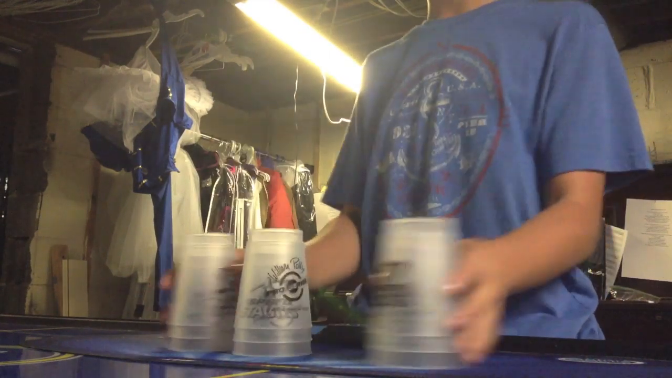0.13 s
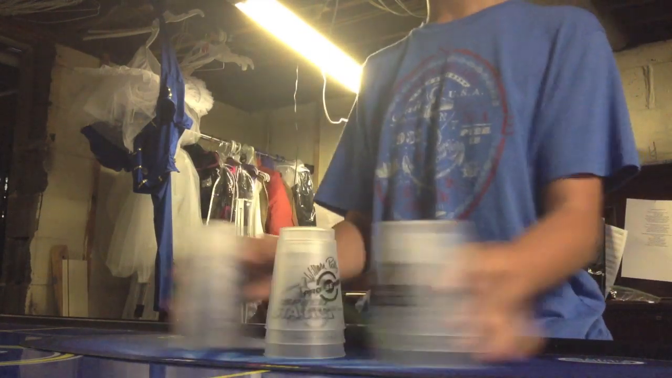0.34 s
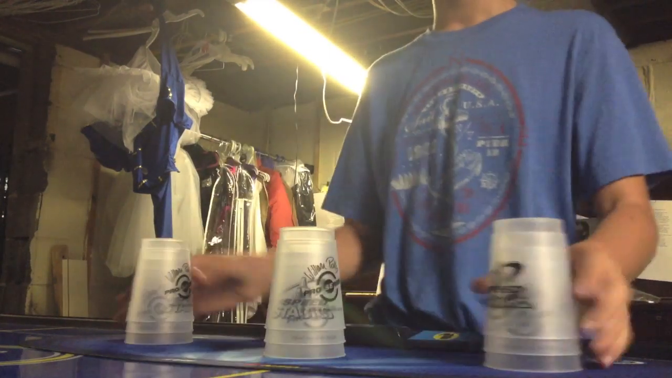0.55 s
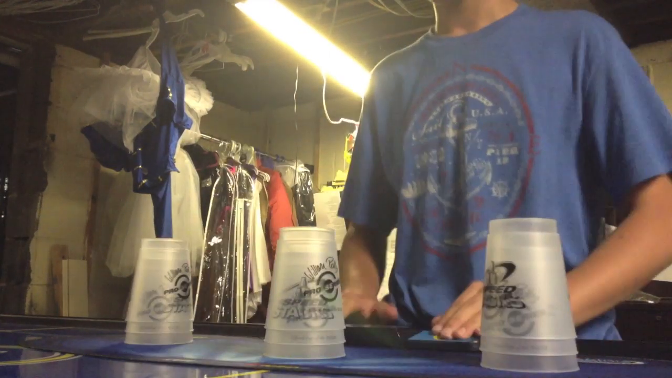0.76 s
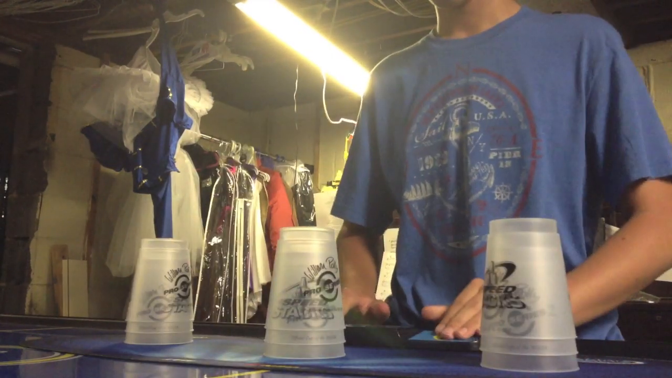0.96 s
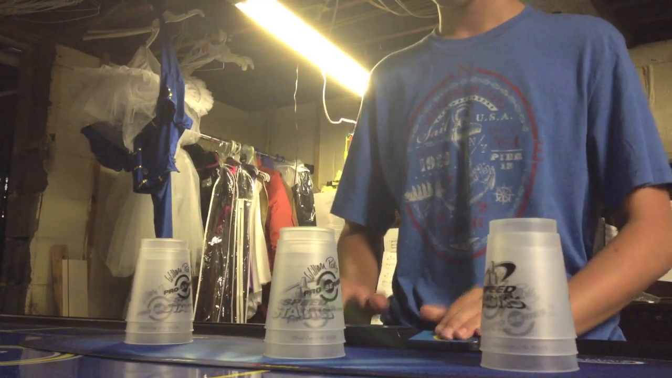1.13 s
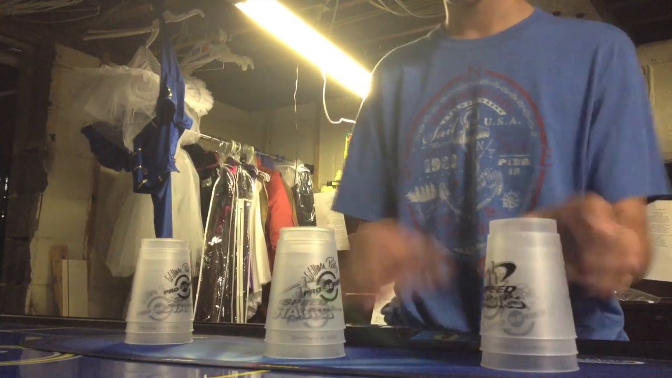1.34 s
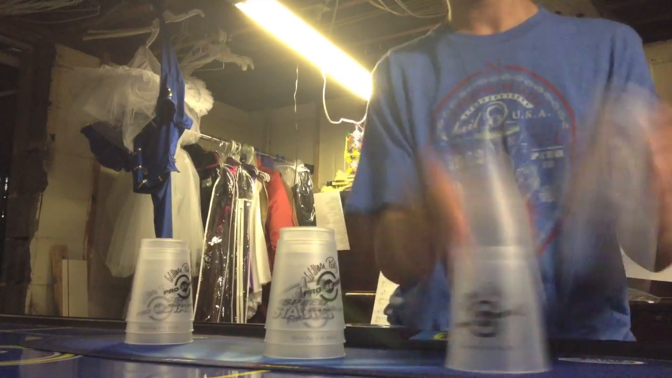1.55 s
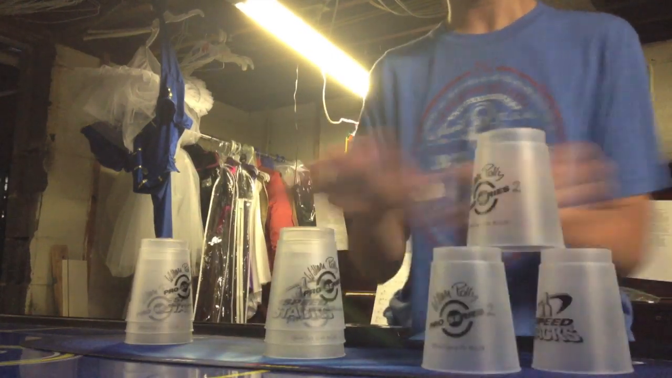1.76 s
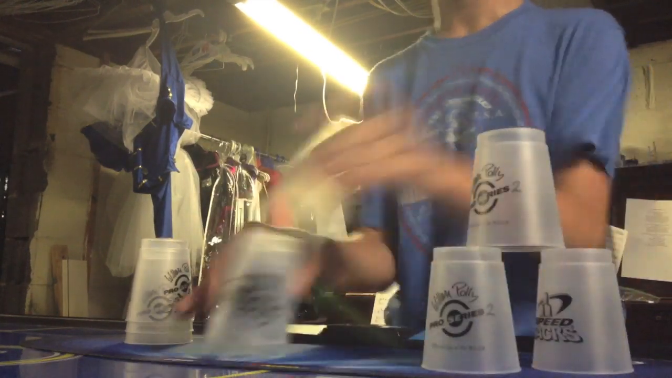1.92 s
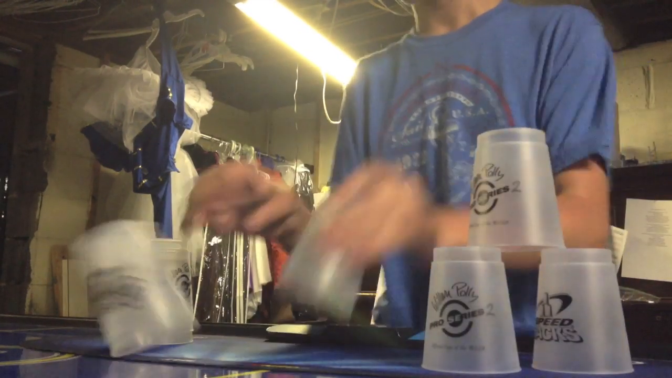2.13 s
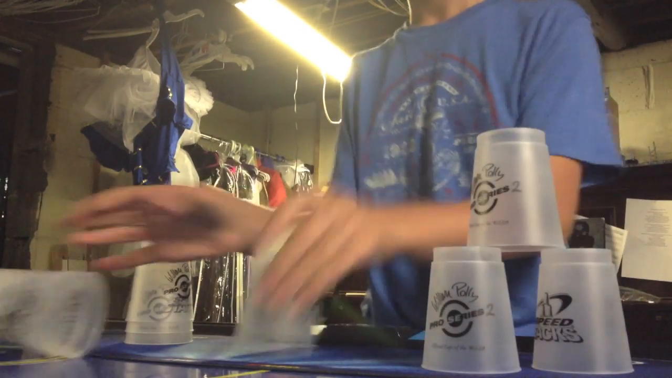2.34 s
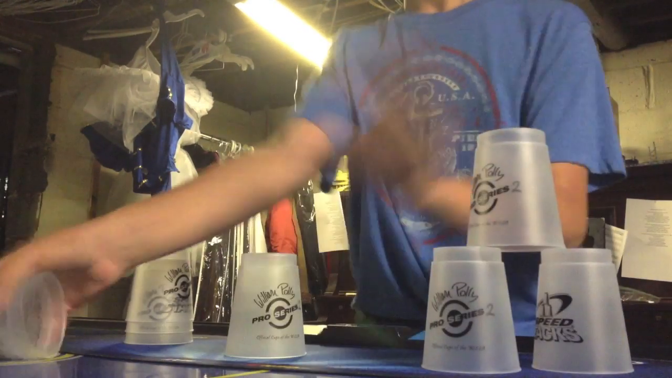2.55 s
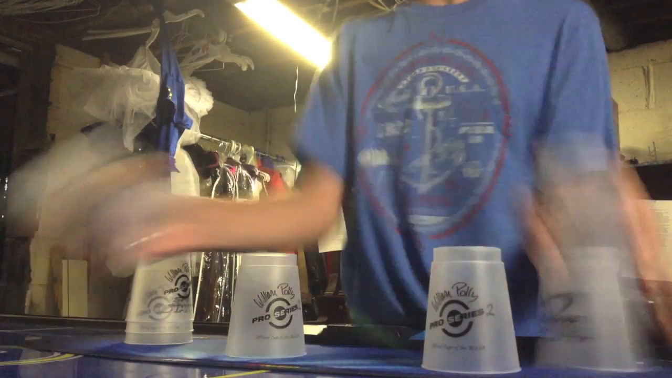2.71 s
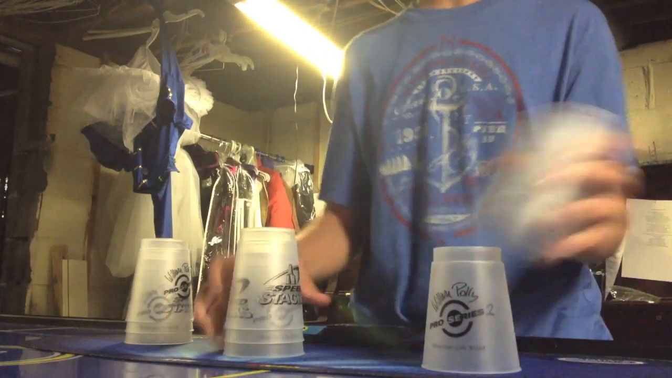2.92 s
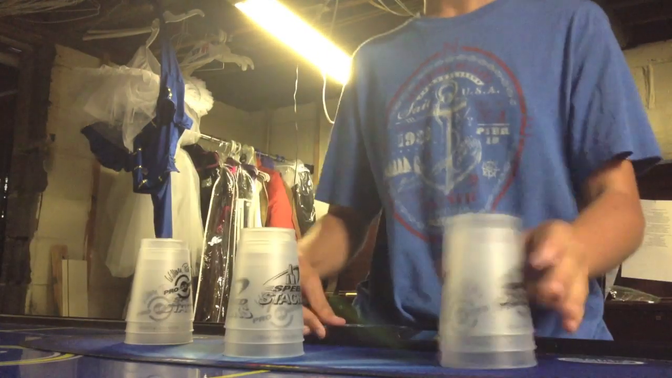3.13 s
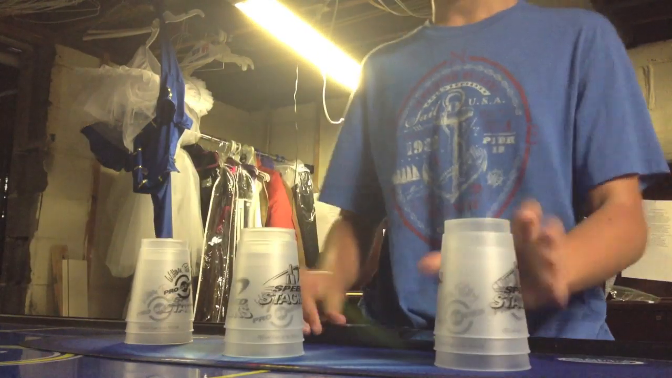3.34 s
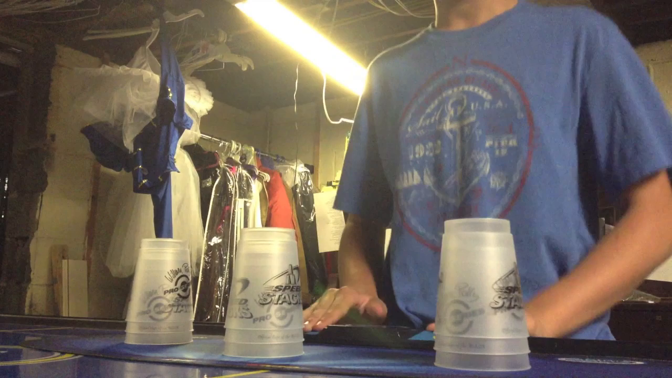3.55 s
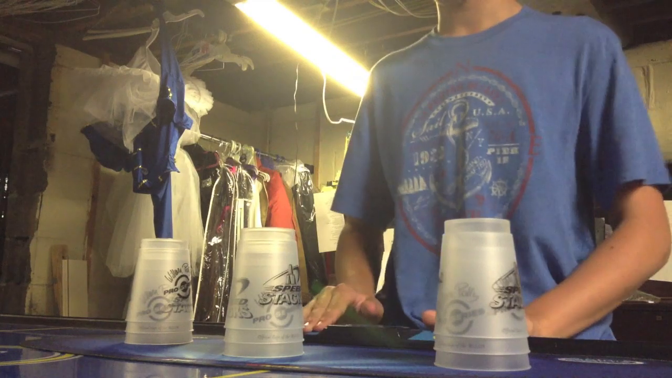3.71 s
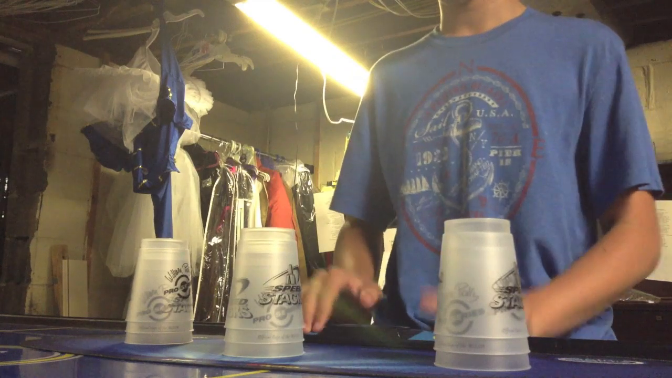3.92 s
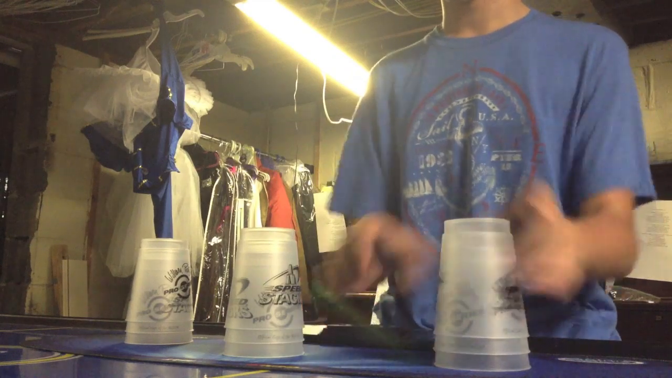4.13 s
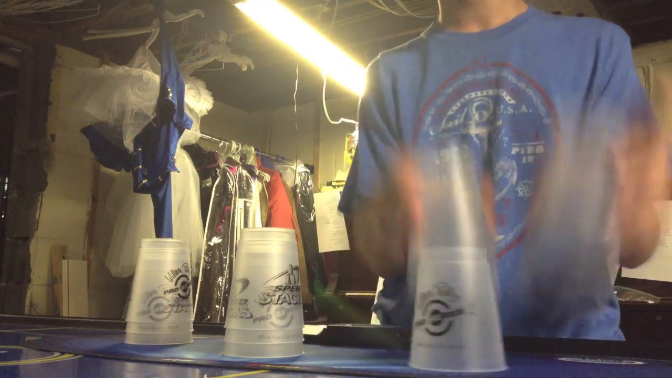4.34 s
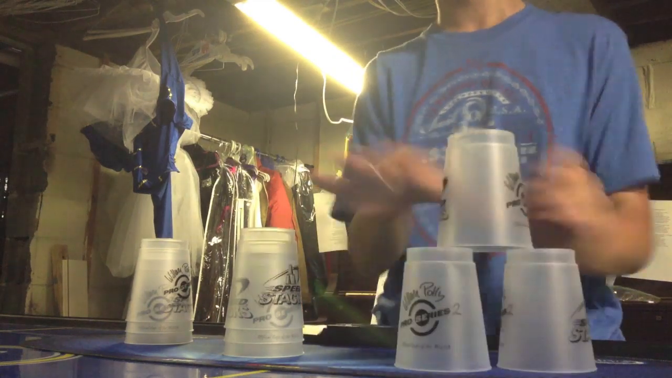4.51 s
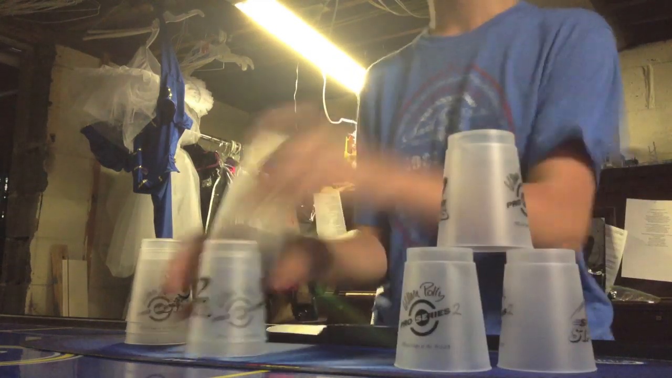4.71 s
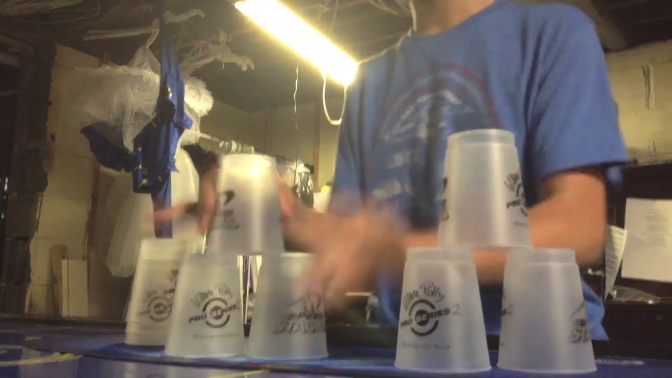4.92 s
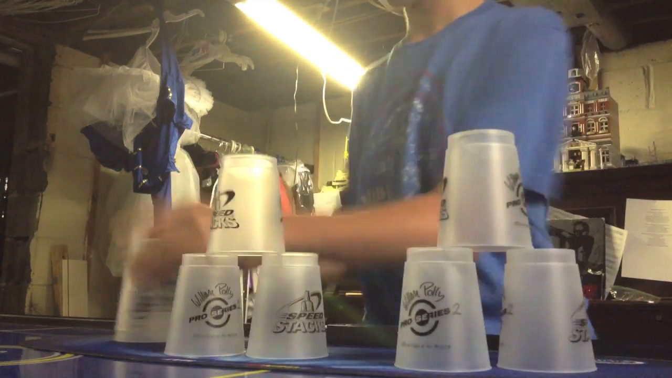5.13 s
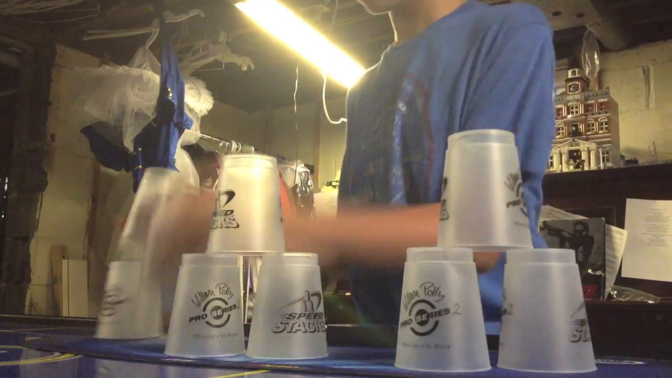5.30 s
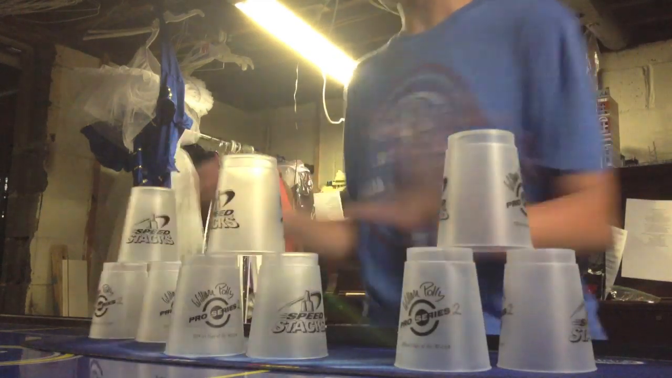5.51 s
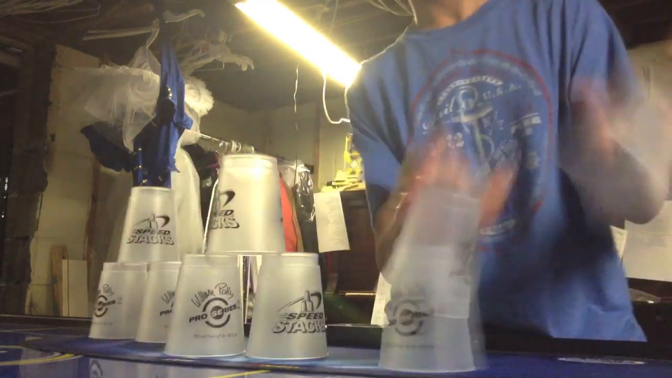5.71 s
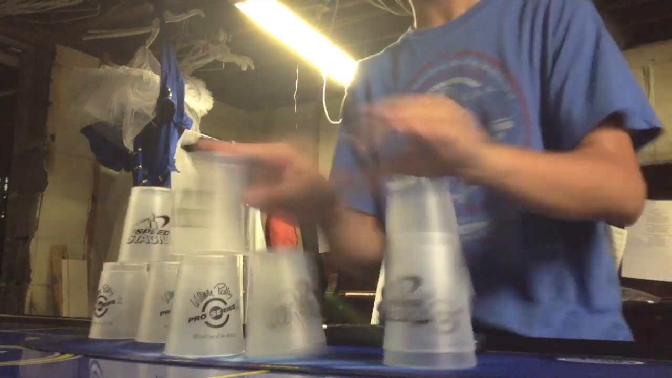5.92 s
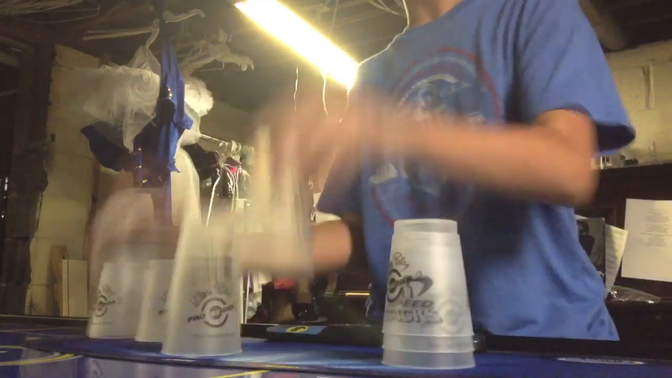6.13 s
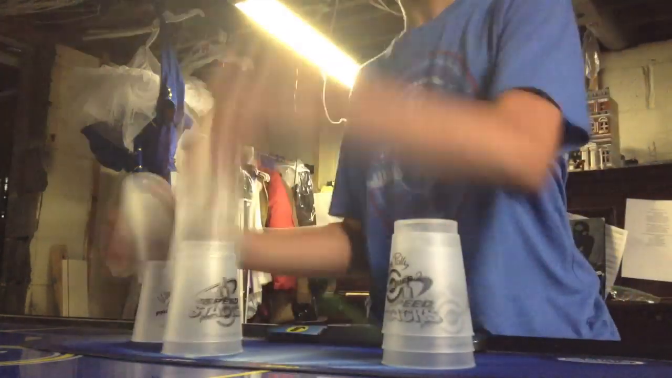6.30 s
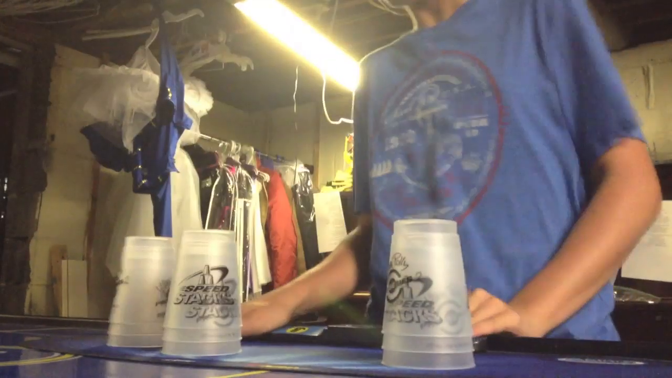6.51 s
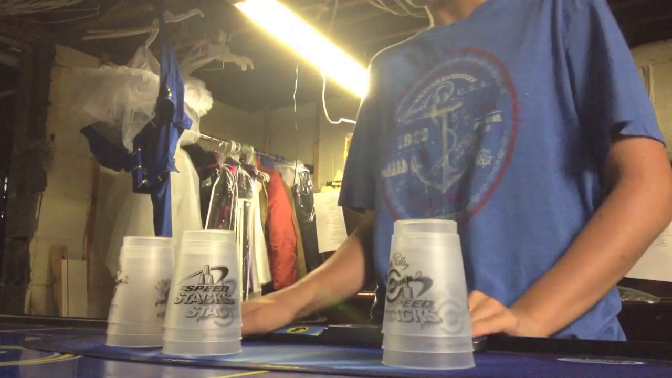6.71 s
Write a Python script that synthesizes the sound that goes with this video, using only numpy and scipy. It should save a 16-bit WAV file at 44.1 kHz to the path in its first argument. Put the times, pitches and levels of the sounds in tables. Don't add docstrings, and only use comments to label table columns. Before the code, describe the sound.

Hollow plastic cups tap and slide on a mat-covered table, settle, then clatter through a fast stacking run. After about a second of quiet room air and far fan hum, a second run begins with heavy clacks and ends in a dense tumble of clicks, thumps and scrapes before stopping. Short indoor echo, close small microphone, little bass, loud hits slightly squashed.

```python
import sys
import numpy as np
from scipy import signal
from scipy.fft import rfft, irfft, next_fast_len
from scipy.io import wavfile
from scipy.ndimage import uniform_filter1d, map_coordinates

SR = 44100
rng = np.random.default_rng(int(sys.argv[2]) if len(sys.argv) > 2 else 0)


def bounce(signal):
    frames = np.transpose(np.atleast_2d(signal))
    limited = np.clip(frames, -1, 1)
    pcm = np.round(limited * 32767).astype(np.int16)
    wavfile.write(sys.argv[1], SR, pcm)


def boost(x):
    u = np.asarray(x, float) / 20
    return 10 ** u


N = 302422


def unit(x):
    return x / np.sqrt(np.mean(x ** 2) + 1e-20)


def along(points, hz):
    f, value = np.transpose(points)
    return np.interp(np.log(hz + 1), np.log(f + 1), value)


def wobble(rate):
    knots = rng.standard_normal(int(N * rate / SR) + 4)
    return map_coordinates(knots, [np.arange(N) * rate / SR])


def filtered(x, response):
    size = next_fast_len(N + SR // 2)
    hz = np.fft.rfftfreq(size, 1 / SR)
    return irfft(rfft(x, size) * response(hz), size)[:N]


def noise(spectrum):
    return unit(filtered(rng.standard_normal(N), lambda hz: boost(along(spectrum, hz))))


def resonances(modes):
    def response(f):
        total = 0
        for k, (center, width, db) in enumerate(modes):
            mode = 1j * f * width / (center ** 2 - f ** 2 + 1j * f * width)
            total = total + (-1) ** k * boost(db) * mode
        return total
    return response


def soft_start(t, attack):
    return 1 - np.exp(-t / attack)


def ring(hz, t60, attack, size):
    t = np.arange(size) / SR
    tone = np.sin(2 * np.pi * hz[:, None] * t)
    return tone * boost(-60 * t / t60) * soft_start(t, attack)


def place(s, rows):
    at = np.round(s * SR).astype(int)[:, None] + np.arange(rows.shape[1])
    return np.bincount(at.ravel(), rows.ravel(), N + rows.shape[1])[:N]


def dying(s, db, t60, attack, size):
    t = np.arange(size) / SR
    power = boost(db[:, None] - 60 * t / t60) ** 2 * soft_start(t, attack) ** 2
    return np.sqrt(place(s, power))


# (frequency [Hz], level [dB per Hz])
AIR = [(30, -32.5), (60, -27), (95, -31), (140, -2), (250, -2.5), (500, -7), (1000, -5), (2000, -12.5),
       (4500, -21), (5800, -31), (7800, -28.5), (11000, -39.5), (16000, -46)]
# (time [s], level [dB])
AIR_LEVEL = [
    (0, -47),
    (1.4, -49),
    (2.3, -54),
    (3.4, -51.5),
    (4.1, -50.5),
    (6.86, -53.5),
]
# (frequency [Hz], width [Hz], level [dB])
HUM = [(353.6, 14, -66), (512, 9.2, -58.5)]


def air():
    s, db = np.transpose(AIR_LEVEL)
    level = np.interp(np.arange(N) / SR, s, db) + 0.51 * wobble(6)
    out = boost(level) * noise(AIR)
    for hz, width, hum_db in HUM:
        hum = filtered(rng.standard_normal(N), resonances([(hz, width, 0)]))
        out += boost(hum_db) * unit(hum)
    return out


# (time [s], scrape level [dB], drag level [dB])
SLIDES = [
    [(0.0, -46, -53.5), (0.168, -54.5, -62), (0.322, -47, -40.5), (0.458, -53, -68), (0.6, -46.5, -47)],
    [(1.42, -71, -69), (1.516, -52, -45), (1.636, -56, -47.5), (1.7, -62, -44)],
    [(1.88, -73.5, -51), (1.934, -47, -40), (2.056, -58, -65), (2.1, -64.5, -53)],
    [(2.7, -64, -61), (2.88, -42, -47), (2.974, -60.5, -39), (3.052, -51, -38), (3.114, -49.5, -53),
     (3.228, -53, -57), (3.3, -58.5, -50)],
    [(4.18, -71, -56), (4.274, -54, -48), (4.414, -57.5, -50), (4.5, -60, -39)],
    [(4.68, -63, -52), (4.788, -70, -45.5), (4.9, -67, -58), (4.95, -57, -61)],
    [(5.12, -65, -46), (5.378, -53.5, -57.5), (5.45, -69, -32)],
    [(5.6, -57.5, -61), (5.746, -51, -38.5), (5.876, -42, -45), (5.926, -46, -30), (6.094, -50, -38),
     (6.214, -61, -36), (6.346, -51.5, -49), (6.4, -51, -44)],
]
# (frequency [Hz], level [dB per Hz])
SCRAPE = [(880, -24), (1500, 5.5), (2210, -1.5), (7170, 2.5), (10600, -2), (14900, -9.5), (15500, -3.5),
          (16000, -37)]
# (frequency [Hz], level [dB per Hz])
DRAG = [(35, -47.5), (60, -26), (248, 16), (471, -11.5), (542, 1), (1520, -24.5), (2500, -32.5),
        (3250, -39.5), (5500, -120)]


def slides():
    t, out = np.arange(N) / SR, np.zeros(N)
    scrape = unit(boost(2.0 * wobble(43) + 2.5 * wobble(400)) * noise(SCRAPE))
    drag = unit(boost(4.5 * wobble(45)) * noise(DRAG))
    for stroke in SLIDES:
        s, scrape_db, drag_db = np.transpose(stroke)
        touch = np.clip(np.minimum(t - s[0], s[-1] - t) / 0.012, 0, 1)
        hiss = boost(np.interp(t, s, scrape_db)) * scrape
        rumble = boost(np.interp(t, s, drag_db)) * drag
        out += touch * (hiss + rumble)
    return out


# (time [s], peak level [dB], wall tone [Hz], dullness: knock against crack [dB])
CLICKS = [(0.057, -31, 1750, 5), (0.0901, -39, 2990, 8.5), (0.1279, -35.5, 1830, 12.5),
          (0.212, -33, 1710, 11.5), (0.246, -32, 3420, 4), (0.33, -38, 1650, 12.5),
          (0.3387, -38, 1980, 3.5), (0.526, -21.5, 4440, 0.5), (0.5888, -10, 3970, 0),
          (0.7855, -39, 3500, 4), (0.79, -24.5, 1550, 1), (1.462, -38.5, 5770, 0), (1.492, -25, 4330, -5),
          (1.5186, -33.5, 1400, 11), (1.646, -24, 4980, 0), (1.6514, -42, 6050, 4),
          (1.6696, -13.5, 6040, -2), (1.674, -27.5, 2370, -7), (1.7001, -10, 7200, 0),
          (1.703, -19.5, 5200, 0), (1.9031, -32, 3290, -6), (1.9953, -18.5, 5500, -3.5),
          (2.0909, -14, 3100, -5), (2.096, -28, 3310, -8), (2.3468, -13.5, 1470, -4),
          (2.4686, -14, 3330, -3), (2.5081, -31, 6140, 0), (2.5526, -30, 5160, -5.5),
          (2.5979, -36.5, 4080, -2), (2.6134, -31, 3800, 4), (2.6208, -18.5, 3600, -0.5),
          (2.734, -40, 4370, -1), (2.7397, -38, 1440, 3), (2.784, -18, 4870, -6), (2.799, -20, 3130, 1),
          (2.836, -22, 3160, 0), (2.8722, -22.5, 3350, -1), (2.8976, -20, 1410, -6), (2.931, -31, 1930, 9),
          (2.9393, -14.5, 1830, 5.5), (2.9541, -23.5, 1480, 7), (3.0235, -13.5, 6000, -3.5),
          (3.057, -23.5, 6480, -8), (3.1459, -33.5, 1730, 4), (3.172, -37, 3410, 2),
          (3.1804, -39, 3160, -3), (3.1949, -17.5, 1540, 5), (3.2194, -20.5, 1420, 2),
          (3.3855, -48, 2680, 12.5), (4.2334, -42, 3440, 6), (4.2394, -46, 2720, 4), (4.2673, -33, 6740, 3),
          (4.2913, -29.5, 1940, 4), (4.4586, -17, 5800, -6.5), (4.4642, -35, 1790, -2),
          (4.476, -30, 1410, 12), (4.4923, -11.5, 3330, 1.5), (4.4974, -14, 2530, -1.5),
          (4.508, -27, 5400, 4), (4.7027, -34, 1430, 4), (4.764, -28, 4400, -3), (4.812, -27, 2000, 6.5),
          (4.91, -31.5, 4800, -12), (4.9373, -28.5, 1410, 4), (4.9498, -23.5, 1550, 6),
          (4.9691, -8.5, 1410, -2.5), (4.9769, -19, 4920, -1), (5.1703, -34.5, 1550, -5),
          (5.211, -44, 1840, -2.5), (5.2271, -35, 5900, -8), (5.255, -31.5, 5050, -14),
          (5.35, -28.5, 4930, -13.5), (5.4096, -40, 5140, 9), (5.4278, -8.5, 5220, -3),
          (5.598, -52.5, 1410, 2), (5.672, -36, 3620, -4), (5.6882, -30, 3120, -6),
          (5.7473, -20.5, 5900, -7.5), (5.7752, -15.5, 3500, -4.5), (5.795, -15.5, 6300, -0.5),
          (5.8673, -30, 1870, 12), (5.8898, -8, 2170, -2.5), (5.8988, -14, 3360, 1.5),
          (5.9054, -15, 5160, -7), (5.9143, -20.5, 5660, -8), (5.9796, -11.5, 4330, -5.5),
          (6.007, -27.5, 2520, 8), (6.0331, -28.5, 1780, 13), (6.046, -25.5, 1520, 9),
          (6.0863, -32, 1880, 1), (6.0914, -27, 1985, 3.5), (6.12, -40.5, 2160, 9),
          (6.1403, -29.5, 3560, 11), (6.1718, -26.5, 6000, -13), (6.1926, -27, 2370, -1),
          (6.2015, -25.5, 1840, -1), (6.2145, -13.5, 1940, 2.5), (6.2261, -11, 3460, -13),
          (6.232, -14, 3320, 6.5), (6.2404, -10, 3970, -2), (6.2528, -9, 5160, -1), (6.37, -23, 1950, 4),
          (6.3762, -14, 5690, -6.5), (6.389, -24.5, 2140, -4), (6.3999, -15, 3260, 2), (6.42, -5, 3270, -2),
          (6.4758, -20.5, 1600, 4), (6.5241, -28, 2780, 8.5)]
# (frequency [Hz], level [dB per Hz])
CRACK = [(1500, -27.5), (3000, -6), (5500, -3), (8000, -4.5), (11000, -9.5), (14500, -18.5), (16000, -24)]
# (frequency [Hz], level [dB per Hz])
KNOCK = [(500, -19), (1100, 1.5), (1800, 2), (3000, -5), (4500, -14.5), (8000, -51.5)]


def clicks():
    s, db, hz, dull_db = np.transpose(CLICKS)
    wall_level = boost(db - 9 + 0.4 * dull_db)[:, None]
    out = place(s, wall_level * ring(hz, t60=0.014, attack=0.0003, size=1024))
    for colour, level in (CRACK, db - 1.5), (KNOCK, db + dull_db - 1.5):
        contact = dying(s, level, t60=0.012, attack=0.00031, size=1024)
        rattle = dying(s, level - 11.5, t60=0.053, attack=0.0015, size=4096) * boost(3.1 * wobble(500))
        echo = dying(s, level - 22, t60=0.23, attack=0.005, size=16384)
        for loudness in contact, rattle, echo:
            out += loudness * noise(colour)
    return out


# (time [s], peak level [dB], air cavity tone [Hz], side wall tone [Hz], side wall against cavity [dB])
THUMPS = [(0.1134, -36, 540, 650, -4), (0.1276, -29, 284, 1410, -9), (0.255, -35, 566, 940, 2),
          (0.2751, -33, 300, 830, -2), (0.2885, -37, 230, 740, -3), (0.3303, -27, 530, 780, -12),
          (0.3503, -30.5, 584, 790, -3), (0.5255, -33, 650, 740, 9), (0.59, -9.5, 566, 670, -2),
          (0.597, -14, 480, 650, -14), (0.6278, -19, 367, 657, -12), (0.726, -35, 520, 990, -13),
          (0.7932, -14, 438, 645, -11.5), (1.4586, -41, 574, 1000, 8), (1.52, -25, 590, 1340, 1),
          (1.6298, -35, 460, 1280, -13), (1.651, -24, 395, 740, -12), (1.6791, -5.5, 494, 750, -1),
          (1.6901, -7, 390, 970, 1.5), (1.7012, -8.5, 660, 740, 4), (1.7092, -9.5, 630, 637, 12),
          (1.7177, -21, 610, 650, -1), (1.909, -30, 510, 656, -10), (1.9874, -27.5, 250, 880, -9),
          (1.997, -27.5, 242, 970, 7), (2.0918, -28.5, 644, 1220, 1), (2.1156, -10, 285, 780, -5.5),
          (2.135, -15, 296, 750, -12), (2.1686, -23, 240, 740, -19), (2.3507, -17, 440, 1150, -2),
          (2.446, -25.5, 273, 900, -12), (2.4684, -23, 573, 860, -6), (2.4741, -17.5, 435, 974, -4),
          (2.6244, -21, 410, 730, 1), (2.737, -22, 348, 1160, -6.5), (2.7839, -25, 430, 1310, 4),
          (2.837, -22.5, 510, 744, 0), (2.8727, -27.5, 312, 1160, -8), (2.8971, -30, 610, 650, 1),
          (2.9069, -19.5, 530, 640, -4.5), (2.9397, -15, 300, 960, 0), (3.0256, -7, 553, 630, -7),
          (3.0878, -27, 290, 650, -7), (3.1941, -13, 325, 840, 5), (3.2199, -13.5, 410, 850, -11),
          (3.3844, -40, 530, 1360, -2), (4.242, -36, 270, 670, -9), (4.2793, -38.5, 280, 800, 2),
          (4.2879, -28, 338, 1230, -7), (4.3478, -36, 260, 1130, -9), (4.405, -40, 270, 830, -7),
          (4.4639, -3, 467, 740, -4), (4.4763, -5.5, 423, 930, -2), (4.4992, -10.5, 640, 706, 4),
          (4.5068, -11.5, 378, 980, 5.5), (4.561, -32, 560, 870, -5), (4.7091, -29.5, 560, 650, -1),
          (4.8125, -29, 660, 1060, -0.5), (4.8855, -29.5, 533, 650, -12), (4.9392, -7, 440, 920, -1.5),
          (4.9507, -4, 570, 880, 2), (4.9585, -8.5, 278, 720, -1), (4.9724, -6.5, 523, 1250, -4),
          (4.9812, -8, 520, 890, -9), (4.9895, -15, 523, 740, -3), (5.033, -25, 240, 650, 1),
          (5.1716, -29, 424, 1250, -8), (5.3358, -28.5, 400, 655, -7), (5.4291, -3, 450, 797, 4),
          (5.676, -25, 404, 1020, -12), (5.6827, -22.5, 560, 650, -4), (5.7398, -20, 410, 640, -2),
          (5.7486, -15.5, 396, 930, 0.5), (5.7988, -8, 410, 750, -2.5), (5.8904, -14, 450, 1130, 0.5),
          (5.973, -18, 270, 990, -4), (5.9807, -7.5, 526, 1075, -2.5), (5.9988, -20, 230, 990, 4),
          (6.0372, -17, 210, 790, -8), (6.0482, -21, 380, 1190, -8), (6.073, -21.5, 520, 676, -7),
          (6.092, -20.5, 270, 1060, 10), (6.1216, -19.5, 430, 630, -4), (6.1386, -25, 270, 650, -2),
          (6.1964, -18.5, 404, 796, -3), (6.208, -21.5, 233, 810, -9), (6.2183, -18.5, 430, 770, -4),
          (6.237, -16.5, 610, 760, -11), (6.2436, -15, 630, 713, -0.5), (6.2709, -22.5, 296, 840, -2),
          (6.3755, -21.5, 664, 1320, 1), (6.4201, -8, 634, 760, 9), (6.4294, -7, 455, 1090, -18),
          (6.4522, -12.5, 455, 646, -3), (6.4584, -15.5, 384, 660, -10), (6.4694, -19, 423, 710, -2.5),
          (6.5247, -25, 646, 650, 4), (6.5339, -21.5, 610, 640, 10)]
# (frequency [Hz], width [Hz], level [dB])
TABLE = [(164.3, 85, 9), (237.4, 30, -4.5), (410, 41, -1), (520, 20, 1.5), (900, 56, -11.5)]


def thumps():
    s, db, cavity_hz, wall_hz, wall_db = np.transpose(THUMPS)
    cavity_level = boost(np.minimum(-wall_db, 0))[:, None]
    wall_level = boost(np.minimum(wall_db, 0) + 3)[:, None]
    cavity = cavity_level * ring(cavity_hz, t60=0.024, attack=0.0008, size=2048)
    wall = wall_level * ring(wall_hz, t60=0.016, attack=0.0005, size=2048)
    push_or_pull = rng.choice([-1, 1], (len(s), 1))
    cup = place(s, boost(db[:, None] + 3) * (cavity + wall) * push_or_pull)
    cup = filtered(cup, lambda f: (1j * f / (110 + 1j * f)) ** 3)
    return cup + boost(-7.5) * filtered(cup, resonances(TABLE))


# (frequency [Hz], time to fall by 60 dB [s])
ROOM = [(100, 0.33), (260, 0.27), (700, 0.2), (1800, 0.24), (5000, 0.19)]


def room(x, parts=3):
    turn = np.floor(np.arange(N) / SR / 0.023) % parts
    out = np.zeros(N)
    for k in range(parts):
        hz, t, z = signal.stft(rng.standard_normal(SR // 2), SR, nperseg=256)
        fade = boost(-60 * t / along(ROOM, hz)[:, None])
        tail = signal.istft(z * fade, SR, nperseg=256)[1]
        share = uniform_filter1d((turn == k) * 1.0, size=64)
        delayed = np.pad(x * share, (130, 0))
        out += signal.fftconvolve(delayed, tail / np.linalg.norm(tail))[:N]
    return out


def scene():
    bodies = thumps()
    return (air() + slides() + clicks() + bodies + boost(-4.5) * room(bodies))[None]


def low_pass(x):
    return signal.sosfilt(signal.butter(12, 16500, fs=SR, output="sos"), x)


def record(dry):
    def microphone(f):
        return (1j * f / (60 + 1j * f)) ** 2 * boost(-30 * (f > 15400))
    x = filtered(dry[0], microphone)[None]
    mix = x / (1 + np.abs(x / 0.72) ** 6) ** (1 / 6)
    return low_pass(mix)


dry = scene()
out = record(dry)
bounce(out)
```